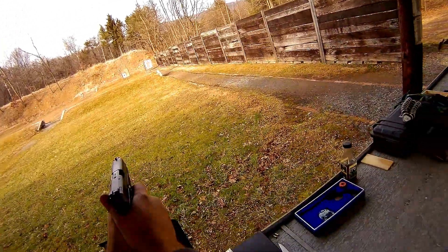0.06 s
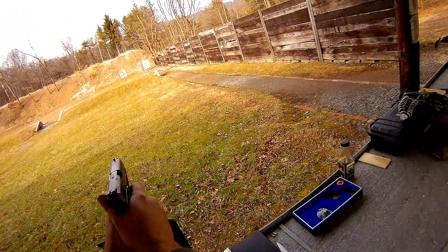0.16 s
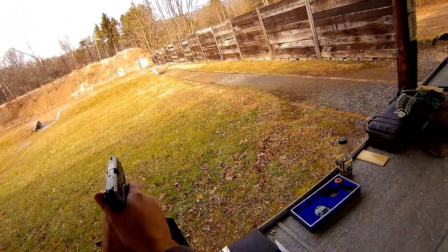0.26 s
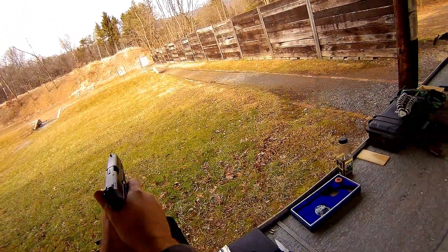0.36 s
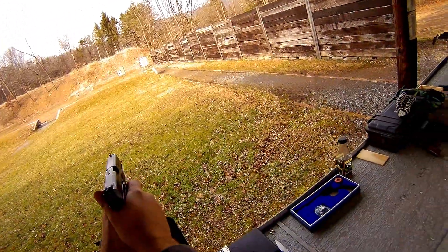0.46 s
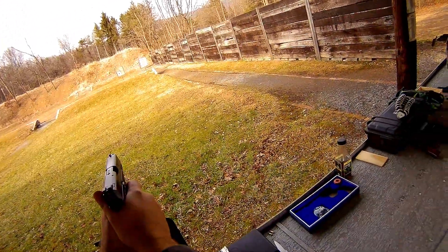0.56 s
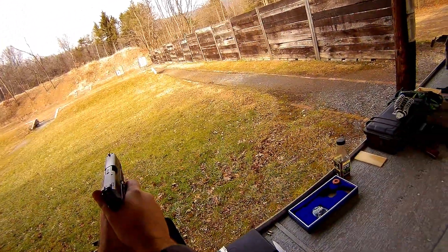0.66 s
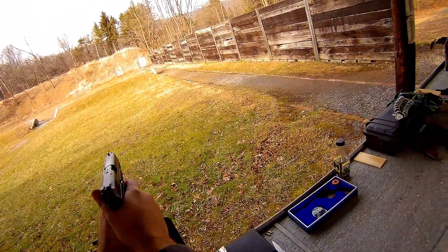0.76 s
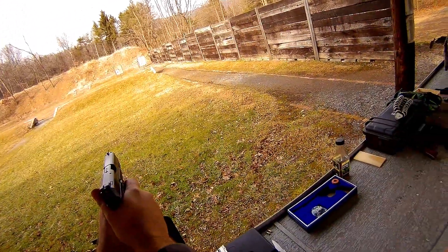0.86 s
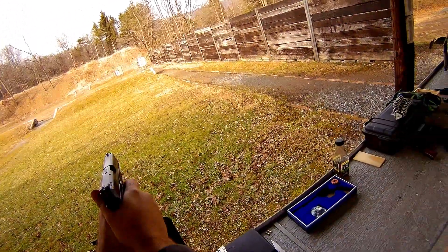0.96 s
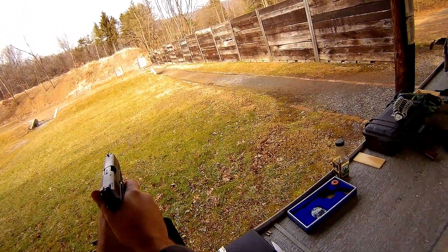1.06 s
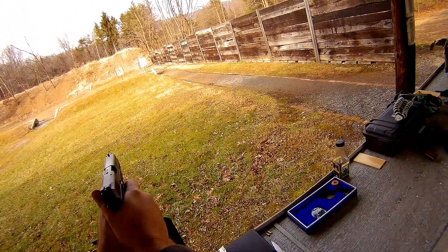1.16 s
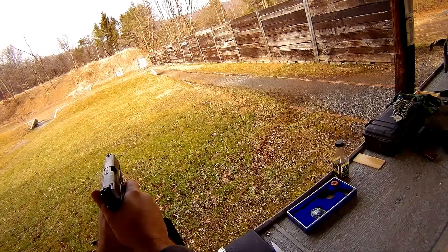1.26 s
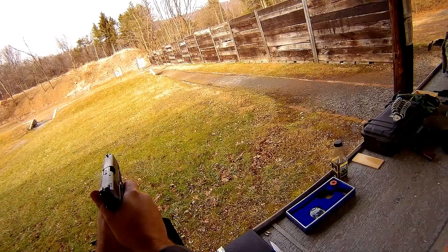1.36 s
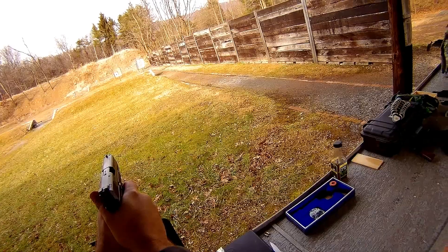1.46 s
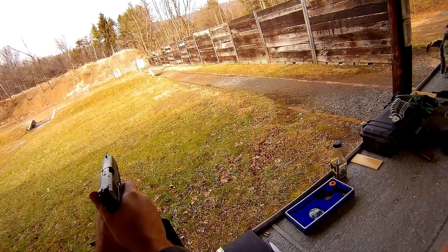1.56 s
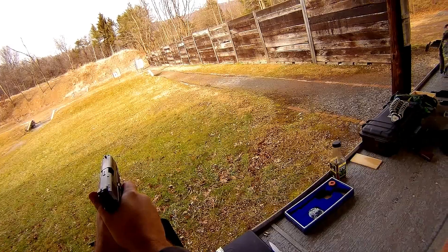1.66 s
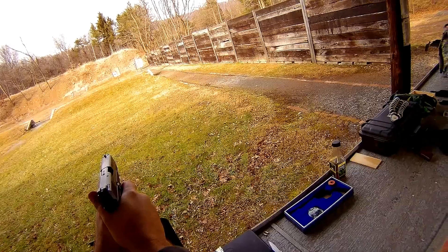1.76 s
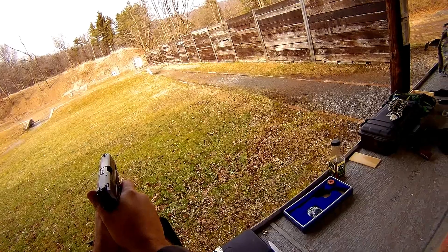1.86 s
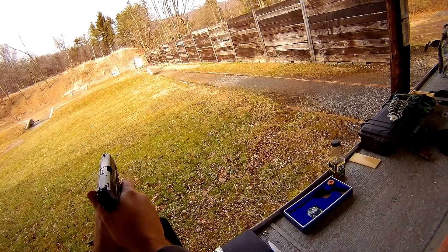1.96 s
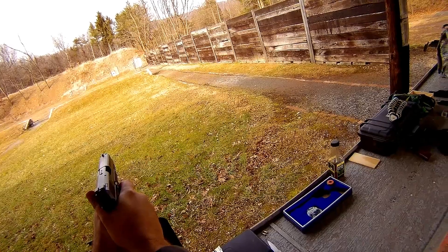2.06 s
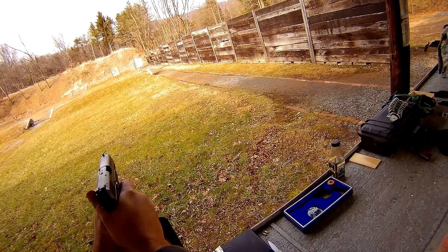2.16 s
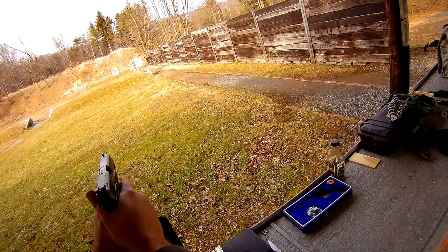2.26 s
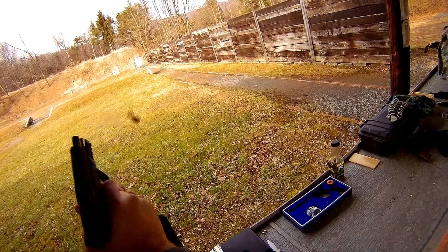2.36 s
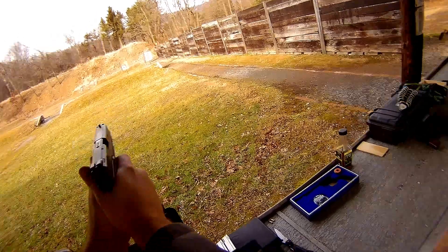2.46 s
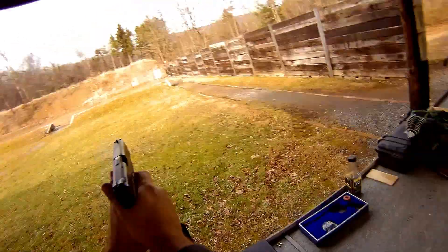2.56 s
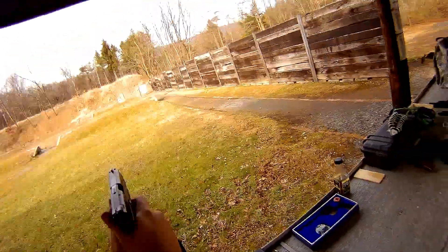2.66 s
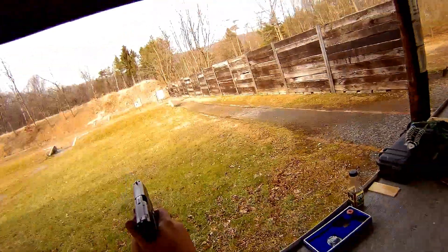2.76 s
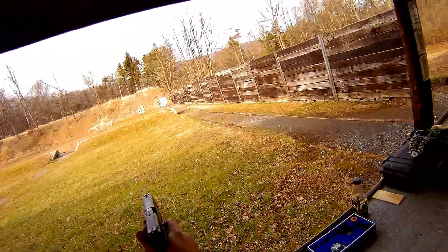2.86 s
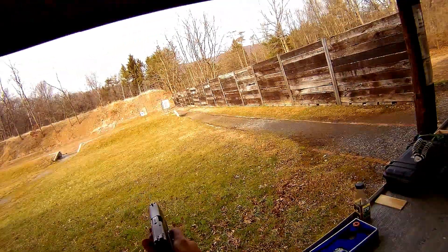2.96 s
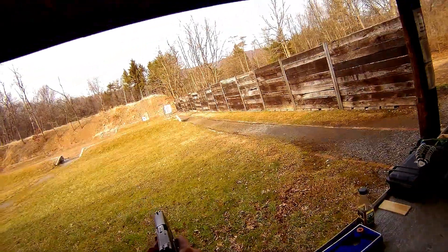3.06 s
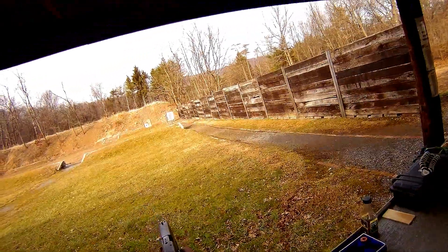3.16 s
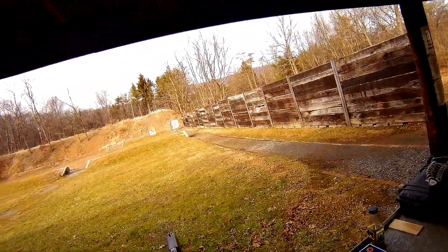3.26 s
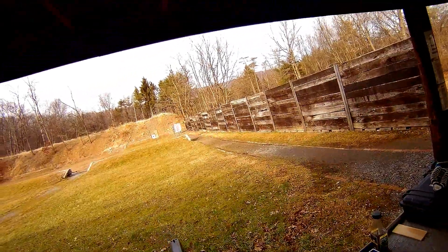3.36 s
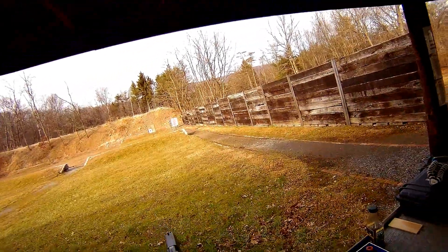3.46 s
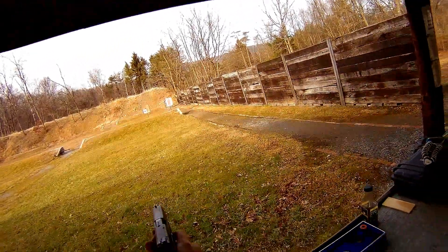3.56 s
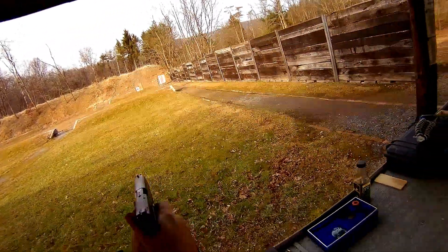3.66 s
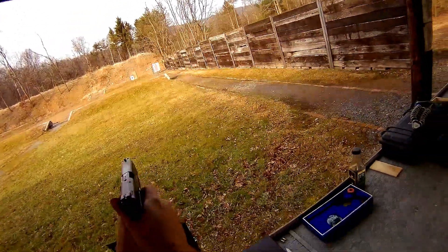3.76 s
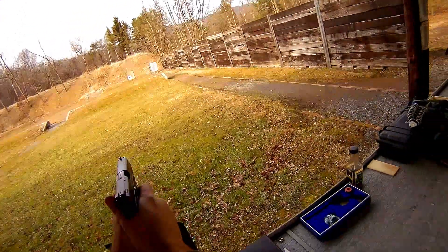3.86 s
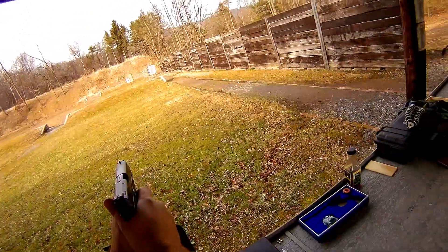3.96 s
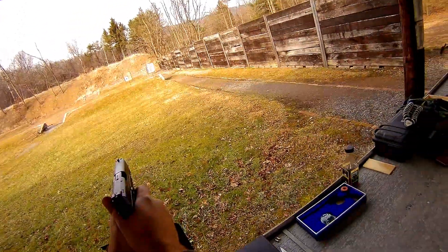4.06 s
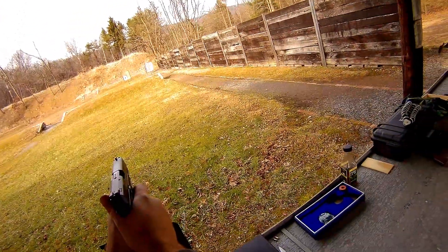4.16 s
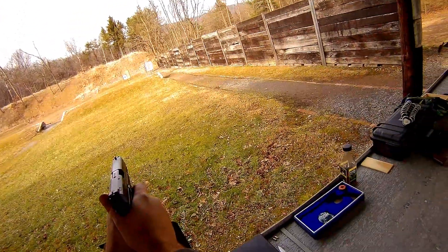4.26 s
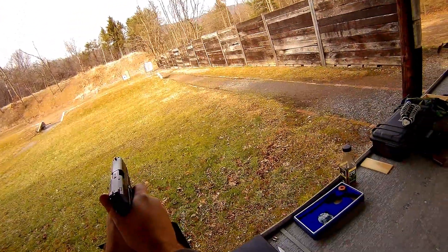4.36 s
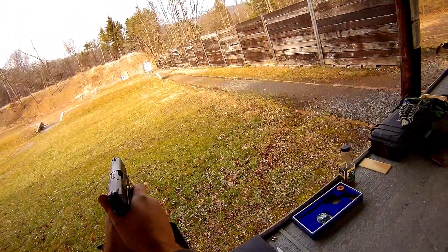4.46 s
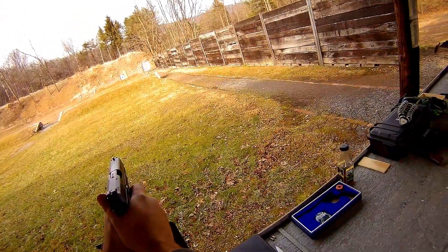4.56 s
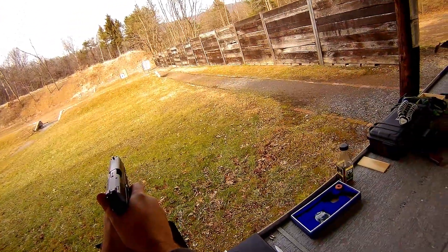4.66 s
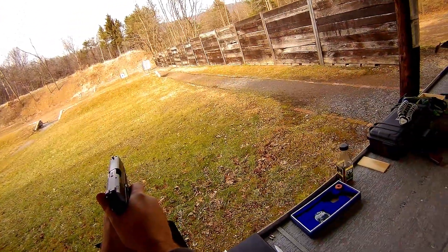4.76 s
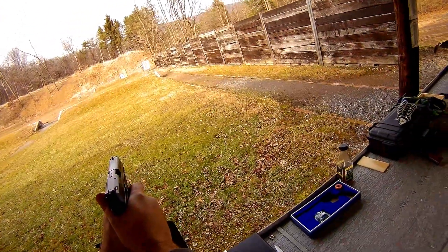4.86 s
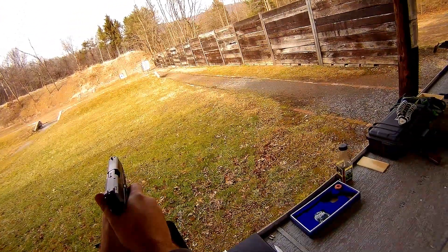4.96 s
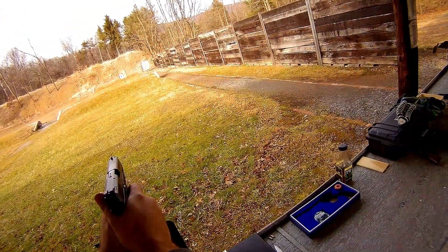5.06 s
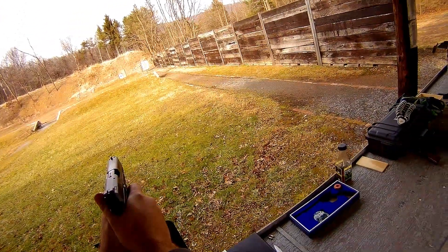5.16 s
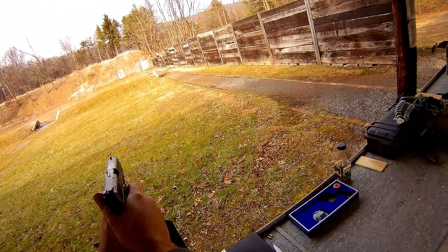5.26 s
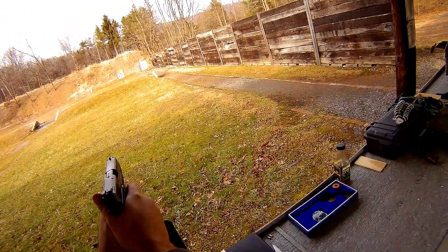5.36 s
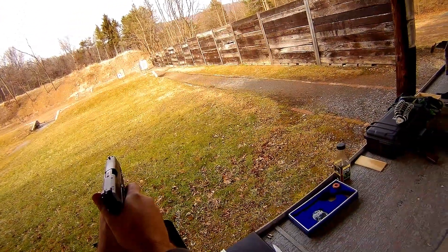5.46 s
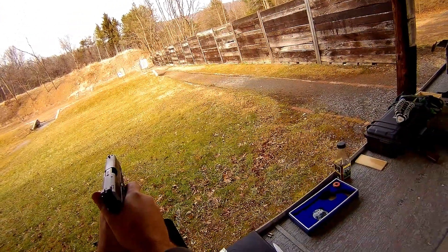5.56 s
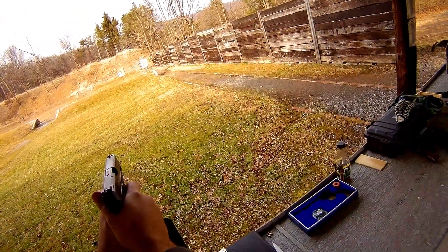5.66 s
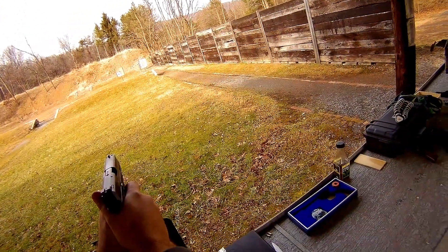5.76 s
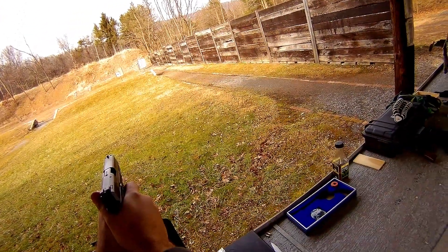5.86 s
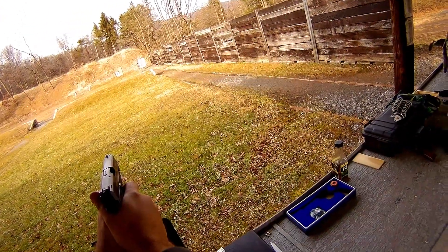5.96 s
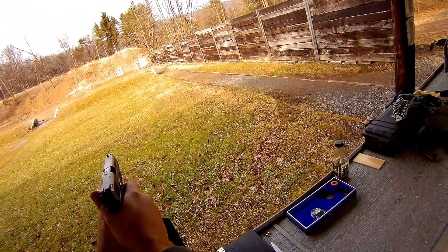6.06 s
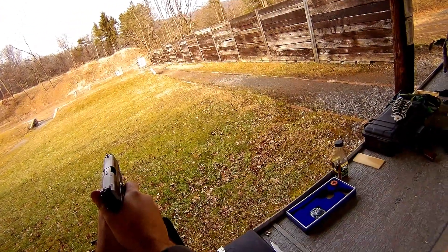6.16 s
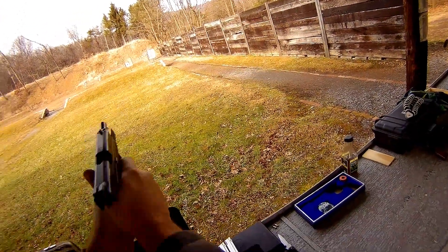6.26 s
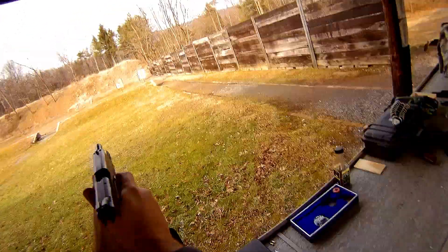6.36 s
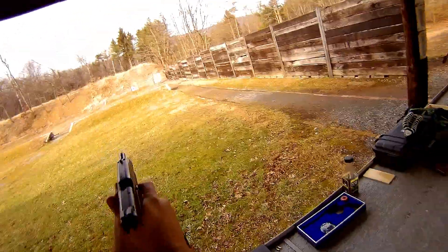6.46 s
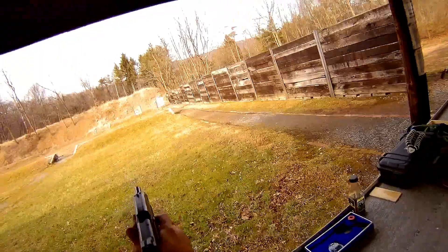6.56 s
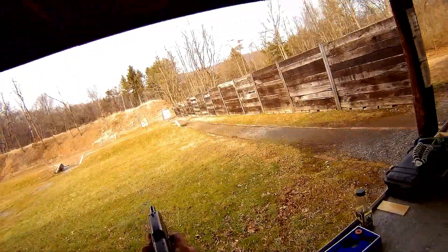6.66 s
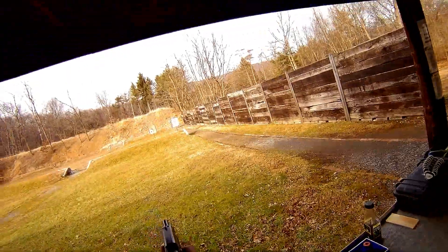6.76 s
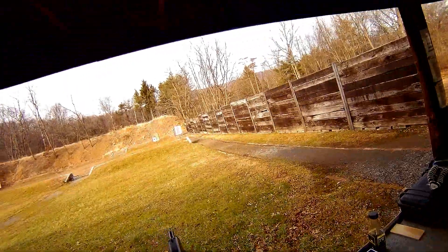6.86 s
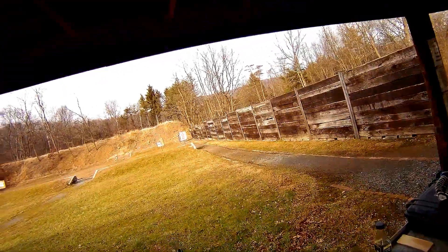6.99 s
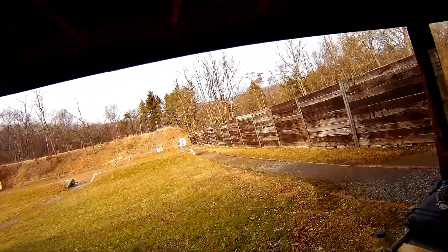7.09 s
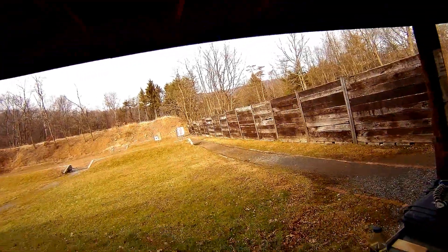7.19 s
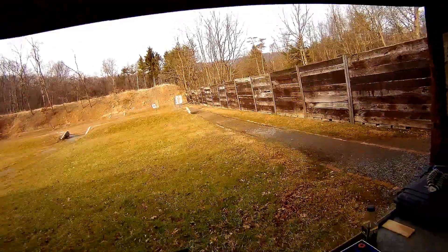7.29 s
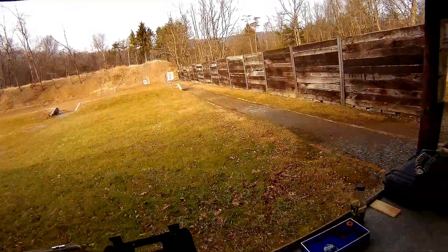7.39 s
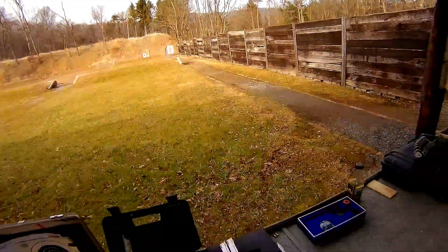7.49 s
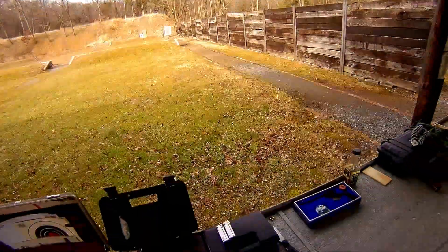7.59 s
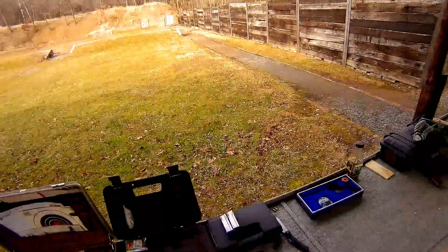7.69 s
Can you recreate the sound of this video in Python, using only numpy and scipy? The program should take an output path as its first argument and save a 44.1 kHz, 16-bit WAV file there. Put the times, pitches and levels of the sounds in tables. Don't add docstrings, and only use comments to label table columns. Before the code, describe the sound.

Two slow pistol shots crack loudly at an outdoor range, each echoing off fence and wooded hills, with brass casings clinking on concrete.

```python
import sys
import numpy as np
from scipy import signal
from scipy.fft import rfft, irfft, next_fast_len
from scipy.io import wavfile
from scipy.ndimage import uniform_filter1d, map_coordinates

SR = 44100
rng = np.random.default_rng(int(sys.argv[2]) if len(sys.argv) > 2 else 0)


def unload_audio(sound):
    columns = np.transpose(np.atleast_2d(sound))
    steps = np.round(np.clip(columns, -1, 1) * 32767)
    wavfile.write(sys.argv[1], SR, steps.astype(np.int16))


def ratio_of_db(decibels):
    return 10 ** (np.asarray(decibels, float) / 20)


N = 340878


def unit(x):
    return x / np.sqrt(np.mean(x ** 2) + 1e-20)


def along(points, hz):
    f, v = np.transpose(points)
    return np.interp(np.log(hz + 1), np.log(f + 1), v)


def filtered(x, response):
    m = next_fast_len(len(x) + 8192)
    return irfft(rfft(x, m) * response(np.fft.rfftfreq(m, 1 / SR)), m)[:len(x)]


def noise(size, spectrum):
    return unit(filtered(rng.standard_normal(size), lambda hz: ratio_of_db(along(spectrum, hz))))


def band(size, centre_hz, octaves):
    hz = np.fft.rfftfreq(size, 1 / SR) + 1
    bell = np.exp(-.5 * (np.log2(hz / centre_hz) / octaves) ** 2)
    return unit(irfft(rfft(rng.standard_normal(size)) * bell, size))


def fade(t, t60, attack):
    return ratio_of_db(-60 * t / t60) * (1 - np.exp(-t / attack))


def wobble(size, rate):
    return map_coordinates(rng.standard_normal(size // 400), [np.arange(size) * rate / SR])


def arrival(t, s, rise, db, fall):
    return ratio_of_db(2 * (db - fall * (t - s))) / (1 + np.exp(-(t - s) / rise))


def add(track, s, sound):
    i = round(s * SR)
    part = sound[max(-i, 0):][:N - max(i, 0)]
    track[max(i, 0):][:len(part)] += part


# (time [s], level [dB])
SHOTS = [
    (-1.22, -1),
    (2.3203, 0),
    (6.1596, 0),
]
# (frequency [Hz], level [dB per Hz])
CRACK = [(35, -51), (60, -21), (673, -2), (3500, -13), (3760, -13), (5710, -6.5), (8470, -23), (9740, -39),
         (15500, -42)]


def shots():
    answer = hills()
    t = np.arange(SR // 5) / SR
    answer[:len(t)] += roof(t)
    slaps(answer, t)
    track = np.zeros(N)
    for s, db in SHOTS:
        add(track, s, ratio_of_db(db) * answer)
        add(track, s, ratio_of_db(db + 13) * fade(t, .065, .002) * noise(len(t), CRACK))
    return track


# (frequency [Hz], level [dB per Hz])
ROOF = [(35, -42), (60, -12), (175, -14), (376, 0), (1100, -3), (2590, -20), (2840, -26), (6560, -25),
        (15500, -53)]


def roof(t):
    boom = filtered(noise(len(t), ROOF), lambda hz: 1 / (1 + (hz / 7000) ** 2))
    return ratio_of_db(10) * fade(t, .19, .004) * boom / (1 + (t / .06) ** 9)


FIRST = 2.3203
# (time [s], level [dB], frequency [Hz])
SLAPS = [
    (2.3707, -7, 420),
    (2.3772, -1, 430),
    (2.4081, -9, 430),
    (2.4554, -37, 5800),
    (2.4554, -22, 1200),
    (2.465, -38, 3800),
    (2.4895, -41, 4500),
    (2.5407, -39, 5500),
    (2.5646, -40, 4000),
]


def slaps(answer, t):
    for s, db, hz in SLAPS:
        u = t * 2 * np.pi * hz
        spread = 1.6 * (hz / 430) ** .55
        add(answer, s - FIRST, -ratio_of_db(db + 7) * np.sin(u) * u * np.exp(-u / spread))
        scatter = (hz > 2000) * fade(t, .025, .0005) * band(len(t), hz, .6)
        add(answer, s - FIRST, ratio_of_db(db - 3) * scatter)


# (frequency [Hz], level [dB per Hz])
HILL_COLOUR = [(140, -40), (230, -13), (340, -12), (480, -5), (650, -3), (900, -6.5), (1200, -11),
               (2900, -30), (3600, -28), (4400, -35), (5600, -31), (8400, -50), (10600, -49), (11400, -64)]
# (frequency [Hz], loss [dB per s])
HILL_LOSS = [(200, 30), (290, 16), (380, -3), (600, 0), (1100, 4), (2500, 12), (3600, 10), (4500, 24),
             (6000, 33), (8000, 38), (12000, 50)]


def hills():
    size = 4 * SR
    hz, t, z = signal.stft(noise(size, HILL_COLOUR), SR, nperseg=512)
    spent = .8 * (1 - np.exp(-np.maximum(t - .27, 0) / .8))
    patches = uniform_filter1d(rng.standard_normal(z.shape), size=9, axis=0)
    patches = uniform_filter1d(patches, size=8, axis=1)
    z = z * ratio_of_db(1.2 * unit(patches) - .5 - np.outer(along(HILL_LOSS, hz), spent))
    roll = signal.istft(z, SR, nperseg=512)[1][:size]

    t = np.arange(size) / SR
    delay, swell = .295, .04
    fence = ratio_of_db(2 * (-21.5 - 30 * t))
    slopes = arrival(t, delay, swell, db=-15, fall=21)
    valley = arrival(t, delay, swell, db=-33, fall=14)
    lumps = 1.5 * wobble(size, rate=90)
    roll = roll * np.sqrt(fence + slopes + valley) * ratio_of_db(lumps)
    veil = ratio_of_db(-58.5 - 9.5 * t) * band(size, 5600, .95)
    sizzle = ratio_of_db(-17 - 310 * t) * band(size, 6300, .47)
    return roll + veil + sizzle + bank(size)


# (frequency [Hz], level [dB per Hz])
BASS_COLOUR = [(25, -32), (70, -24), (105, -10), (130, 0), (155, -5), (190, 0), (240, -4), (310, -22),
               (500, -120)]


def bank(size):
    hz, t, z = signal.stft(noise(size, BASS_COLOUR), SR, nperseg=2048)
    fall = 43
    delay = .165 + .09 * np.log2(150 / np.clip(hz, 40, 400))[:, None]
    early = ratio_of_db(2 * (-42 - fall * t))
    z = z * np.sqrt(arrival(t, delay, .015, -21.5, fall) + early)
    return signal.istft(z, SR, nperseg=2048)[1][:size]


# (frequency [Hz], t60 [s])
BRASS = [(8030, .2), (8110, .36), (8200, .28)]
# (frequency [Hz], t60 [s])
BRASS_HIGH = [(13750, .13), (13900, .13), (14050, .1), (14400, .14)]


def rings(modes, t):
    total = 0
    for hz, t60 in modes:
        strength = ratio_of_db(rng.normal(0, 2) - 60 * t / t60)
        total = total + strength * np.sin(2 * np.pi * (hz * t + rng.random()))
    return total


# (time [s], base [dB], rim [dB], ring [dB], high ring [dB])
CLINKS = [(0.1531, -22, -61, -55, -82), (0.4768, -38, -69, -51, -70), (0.4904, -44, -61, -49, -60),
          (0.6669, -56, -70, -57, -63), (0.6938, -49, -65, -58, -67), (0.7432, -61, -77, -55, -80),
          (0.7994, -59, -76, -62, -64), (0.842, -52, -74, -66, -79), (0.9253, -54, -76, -68, -78),
          (3.3762, -24, -51, -51, -60), (3.5373, -50, -74, -77, -81), (3.8815, -55, -59, -67, -70),
          (6.9922, -18, -36, -53, -55), (7.0521, -38, -59, -64, -74), (7.3728, -48, -58, -68, -80),
          (7.5649, -29, -73, -48, -72)]


def casings():
    track, t = np.zeros(N), np.arange(SR // 3) / SR
    for s, db, rim_db, ring_db, high_db in CLINKS:
        smear = fade(t, .13, .006)
        tick_hz = 4150 + 15 * (db + 55)
        base = (fade(t, .012, .0002) + ratio_of_db(-10.5) * smear) * band(len(t), tick_hz, .31)
        rim = smear * band(len(t), 10200, .2)
        rim += 1.7 * fade(t, .012, .0003) * band(len(t), 10500, .32)
        tick = ratio_of_db(db) * base + ratio_of_db(rim_db) * rim
        ring = ratio_of_db(ring_db - 3) * rings(BRASS, t) + ratio_of_db(high_db - 7) * rings(BRASS_HIGH, t)
        add(track, s, ratio_of_db(-3) * tick + ring * (1 - np.exp(-t / .002)))
    return track


# (time [s], peak [dB], frequency [Hz], rattle [dB])
KNOCKS = [(.8413, -52, 1710, -7), (.9252, -45, 1680, -14), (.986, -48, 1620, -19), (1.0539, -50, 1630, -14),
          (1.1008, -38, 1660, -13), (1.1432, -44, 1660, -16), (1.1776, -42, 1670, -16),
          (1.448, -55, 1800, -13), (1.8306, -57, 1800, -20), (1.8694, -60, 1070, -25),
          (5.2619, -56, 1170, -1), (5.288, -52, 1700, -2), (5.3562, -55, 1900, -6), (5.3901, -55, 1670, -8),
          (5.4854, -60, 1650, -20), (5.5255, -43, 1680, -9), (5.548, -46, 1680, -9),
          (5.7174, -59, 1770, -17)]


def knocks(track, t):
    for s, db, hz, rattle_db in KNOCKS:
        body = .9 * band(len(t), hz, .07) + .15 * band(len(t), 1.27 * hz, .07)
        body += .6 * band(len(t), hz, .45)
        rattle = ratio_of_db(rattle_db + 3.5) * fade(t, .15, .001) * band(len(t), 3800, .6)
        add(track, s, ratio_of_db(db - 5) * (fade(t, .18, .002) * body + rattle))


# (time [s], level [dB])
SNAP = (7.2586, -26)
# (frequency [Hz], level [dB], t60 [s])
CATCH = [(1100, 0, .04), (2900, -14, .018), (3700, -13, .018), (4500, -13, .018)]


def catch(track, t):
    snap = sum(ratio_of_db(db) * fade(t, t60, .001) * np.sin(2 * np.pi * hz * t) for hz, db, t60 in CATCH)
    add(track, SNAP[0], ratio_of_db(SNAP[1] + 5) * snap)


# (time [s], peak [dB], frequency [Hz], tap [dB])
THUDS = [
    (5.027, -51, 237, -1),
    (5.476, -52, 245, -11),
]


def thuds(track, t):
    for s, db, hz, tap_db in THUDS:
        board = fade(t, .075, .06) * 1.8 * np.sin(2 * np.pi * hz * t)
        tap = ratio_of_db(tap_db - 11) * fade(t, .06, .002) * band(len(t), 700, .4)
        add(track, s, ratio_of_db(db + 18.5) * (board + tap))


# (peak time [s], level [dB], rise [s], fall [s], frequency [Hz])
SCRAPES = [(4.648, -42, .016, .045, 850), (4.648, -52, .018, .06, 1500), (4.648, -64, .018, .08, 4300),
           (4.74, -56, .008, .07, 1400), (4.74, -67, .008, .1, 4800), (4.81, -64, .02, .06, 1400),
           (4.81, -72, .02, .08, 4500), (5.04, -75, .005, .05, 4500), (5.545, -59, .01, .05, 900),
           (7.058, -33, .003, .02, 900), (7.416, -44, .01, .05, 4300), (7.416, -60, .01, .04, 8000),
           (7.702, -27, .003, .1, 1700), (7.702, -28, .003, .1, 4700), (7.722, -20, .013, .1, 1400),
           (7.722, -23.5, .013, .1, 4500)]


def scrapes(track, t):
    lead = .08
    for s, db, rise, fall, hz in SCRAPES:
        u = t - lead
        stroke = np.where(u < 0, np.exp(-(u / rise) ** 2), ratio_of_db(-20 * np.maximum(u, 0) / fall))
        grit = 2 * wobble(len(t), rate=250)
        add(track, s - lead, ratio_of_db(db - 1 + grit) * stroke * band(len(t), hz, .47))


def handling():
    track, t = np.zeros(N), np.arange(SR // 4) / SR
    for source in (knocks, catch, thuds, scrapes):
        source(track, t)
    return track


# (time [s], frequency [Hz], level [dB])
ENGINE = [(0, 104, -70), (1.0, 99, -68), (2.2, 102, -67), (3.6, 104, -74), (3.9, 112, -64), (4.7, 108, -68),
          (5.0, 100, -77), (5.5, 93, -73), (7.73, 90, -72)]


def motor(t):
    s, hz, db = np.transpose(ENGINE)
    turns = np.cumsum(np.interp(t, s, hz) + 1.5 * wobble(N, rate=4)) / SR
    tone = np.sin(2 * np.pi * turns) + .3 * np.sin(4 * np.pi * turns)
    return ratio_of_db(np.interp(t, s, db) + .5 + 2.2 * wobble(N, rate=8)) * tone


# (time [s], level [dB])
TRAFFIC = [(0, -65), (1.2, -72), (2.2, -84), (3.6, -68), (4.8, -73), (5.6, -86), (7.73, -66)]
# (time [s], level [dB], applied 2.5-fold)
GUSTS = [(0, 1.5), (1.1, 1), (1.35, 3.5), (1.6, 0), (4.5, -2), (6, -2), (7.73, 2.5)]
# (frequency [Hz], level [dB per Hz])
AIR = [(12, -32), (20, -5), (79, -1.5), (228, -23), (607, -18), (849, -24), (1090, -24), (1290, -27),
       (1440, -25), (2260, -32), (12400, -38), (14700, -44), (16000, -54)]


def outdoors():
    t = np.arange(N) / SR
    road = ratio_of_db(np.interp(t, *np.transpose(TRAFFIC))) * band(N, 250, .45)
    gust_db = -72 + 2.5 * np.interp(t, *np.transpose(GUSTS)) + 3 * wobble(N, rate=6)
    gusts = ratio_of_db(gust_db) * band(N, 40, .6)
    air = ratio_of_db(-64.3 + .8 * wobble(N, rate=5)) * noise(N, AIR)
    return air + motor(t) + road + gusts


def scene():
    return (shots() + casings() + handling() + outdoors())[None]


def low_pass(x):
    return signal.sosfilt(signal.butter(12, 16390, fs=SR, output="sos"), x)


def record(dry):
    t, x = np.arange(N) / SR, dry[0]
    since = np.min([np.where(t >= s, t - s, 9) for s, db in SHOTS], axis=0)
    ceiling = .43 + .54 * np.exp(-(since / .029) ** 2) + np.maximum(since - .1, 0)
    bias = .45 * (1 - np.exp(-since / .02)) / (1 + (since / .058) ** 9)
    x = x + bias
    x = x / (1 + np.abs(x / np.where(x > 0, ceiling, .95)) ** 3) ** (1 / 3)
    swing = .3 * np.sin(2 * np.pi * 45 * since) * np.exp(-since / .018)
    x = x - .35 * bias + swing
    x = filtered(x, lambda hz: 1j * hz / (18 + 1j * hz))
    dull = filtered(x, lambda hz: np.where(hz < 8600, 1, ratio_of_db(-24 - hz / 2500)))
    x = np.where(since < .027, dull, x)
    mix = np.clip(.92 * x, -1, 1)[None]
    return low_pass(mix)


dry = scene()
out = record(dry)
unload_audio(out)
```